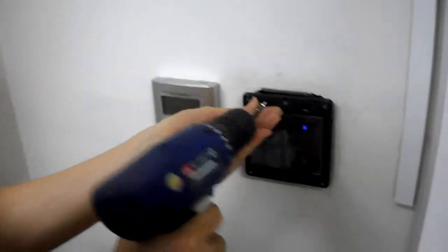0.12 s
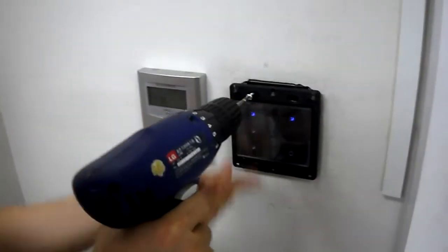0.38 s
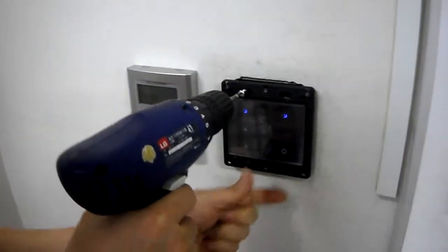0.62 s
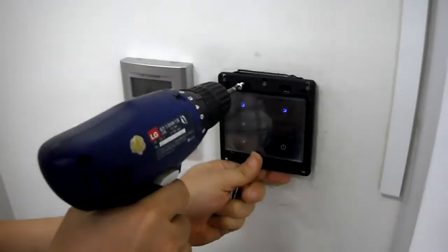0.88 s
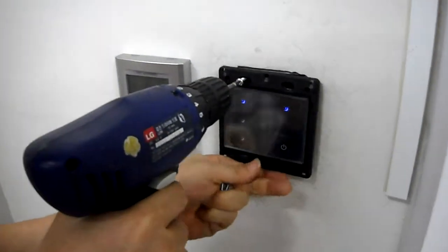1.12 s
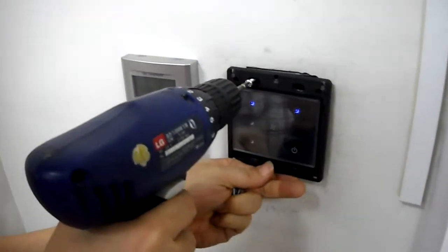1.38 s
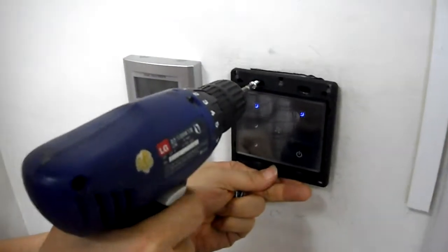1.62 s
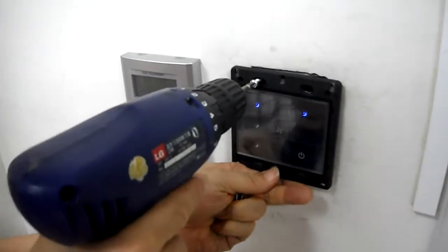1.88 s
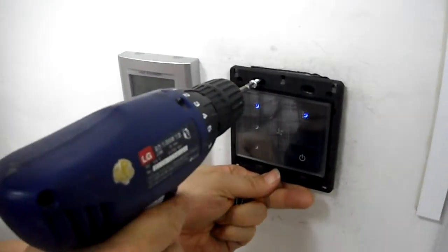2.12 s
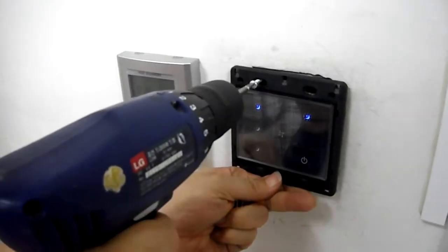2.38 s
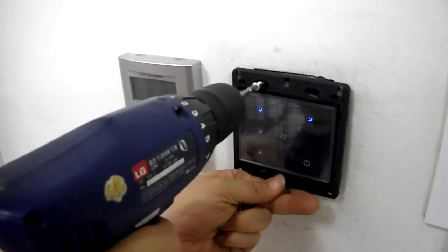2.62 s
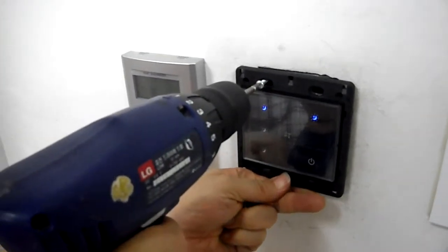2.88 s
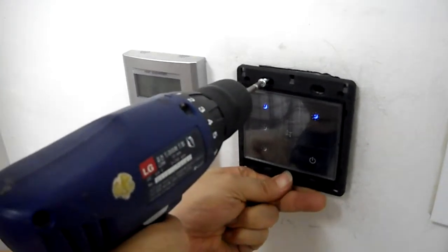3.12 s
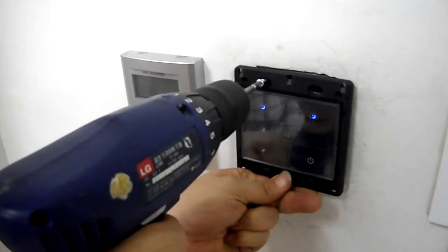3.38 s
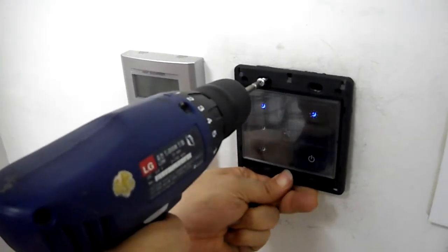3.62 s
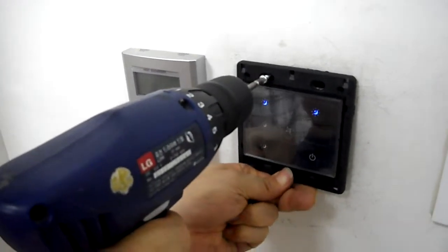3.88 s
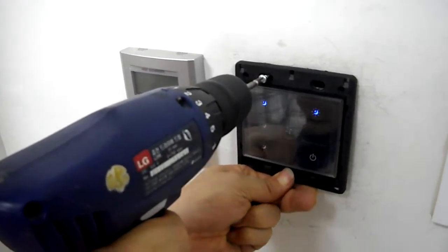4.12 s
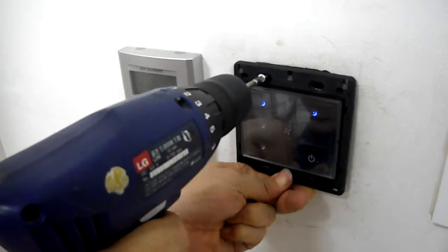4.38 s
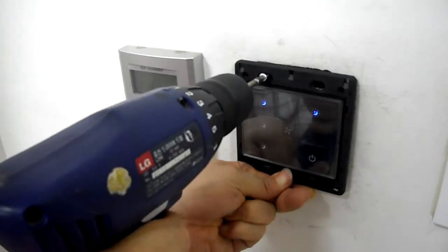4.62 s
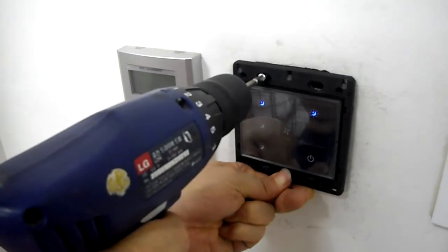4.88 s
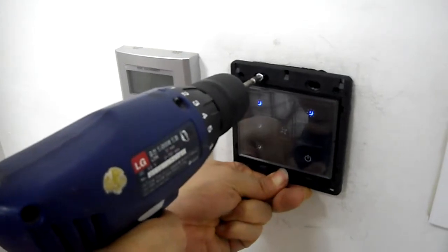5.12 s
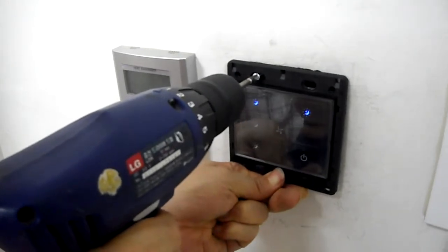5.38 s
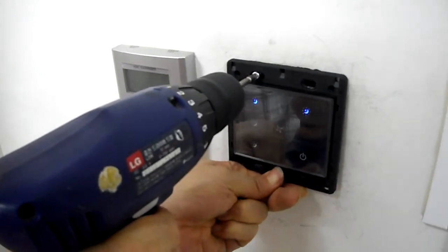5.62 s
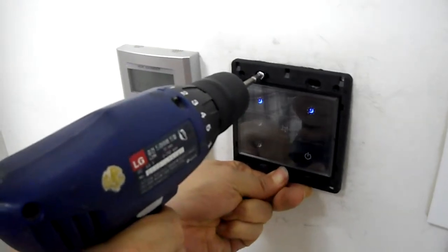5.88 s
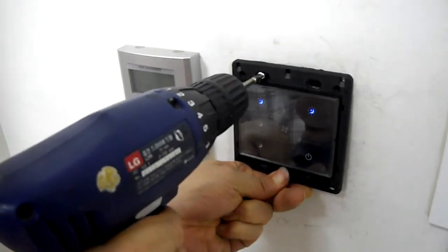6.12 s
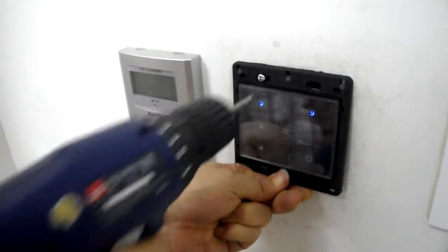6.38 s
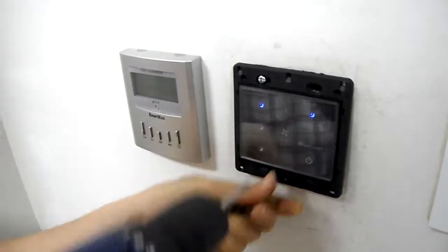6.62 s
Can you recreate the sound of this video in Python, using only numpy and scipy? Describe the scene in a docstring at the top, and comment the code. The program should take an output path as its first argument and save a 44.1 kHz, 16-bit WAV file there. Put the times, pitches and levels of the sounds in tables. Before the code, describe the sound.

Close camera sound, mono and thin in the bass: quiet electronic hiss, small scratchy taps on plastic, then two hard cracks of a switch. A cordless drill rises fast to a steady buzzing whir with a singing high tone, clacks once, sags in pitch under load, groans, and winds down to a stop. Faint handling taps remain in the short, hard room reflections.

```python
"""In a small hard room, a cordless drill drives a screw into a plastic wall plate, close to a camera.
Plastic taps and a double switch snap are shaped noise bursts with ringing knocks; a few taps return later.
Then throbbing gear noise, tones at multiples of the armature's turning and the singing speed control
follow the motor as it spins up, bends under load and stalls. The camera adds mono hiss, murmur,
frame-rate ticks and faint whistles; its noise suppressor lets hiss and murmur up after loud sound."""
import sys
import numpy as np
from scipy import signal
from scipy.fft import rfft, irfft, next_fast_len
from scipy.io import wavfile
from scipy.ndimage import uniform_filter1d

SR = 44100
rng = np.random.default_rng(int(sys.argv[2]) if len(sys.argv) > 2 else 0)


def rack_gain(trim_db):
    """Turn a fader trim in dB into the linear factor to multiply a signal by."""
    fader = np.asarray(trim_db, float)
    return 10 ** (fader / 20)


def bounce(signal):
    """Save signal as a 16-bit WAV file at the path given by the first command-line argument."""
    frames = np.transpose(np.atleast_2d(signal))
    limited = np.clip(frames, -1, 1)
    pcm = np.round(limited * 32767).astype(np.int16)
    wavfile.write(sys.argv[1], SR, pcm)


N = 297791
T = np.arange(N) / SR  # s


def evened(x):
    """Brings a signal to rms 1."""
    return x / np.sqrt(np.mean(x ** 2) + 1e-20)


def peaked(x):
    """Brings a signal to peak 1."""
    return x / abs(x).max()


def read(points, hz):
    """Reads a (f, value) curve along a logarithmic frequency axis."""
    f, value = np.transpose(points)
    return np.interp(np.log(hz + 1), np.log(f + 1), value)


def curves(rows):
    """A gate that is open only inside the table, then the table's columns over time."""
    s, *columns = np.transpose(rows)
    gate = np.clip(np.minimum(T - s[0], s[-1] - T) / 0.001, 0, 1)
    return gate, *(np.interp(T, s, c) for c in columns)


def shape(x, gain):
    """Filters by a gain given as a function of Hz."""
    size = next_fast_len(N)
    return irfft(rfft(x, size) * gain(np.fft.rfftfreq(size, 1 / SR)), size)[:N]


def band(x, lo_hz, hi_hz):
    """Keeps the band between two frequencies."""
    sos = signal.butter(2, [lo_hz, min(hi_hz, SR / 2.1)], "bandpass", fs=SR, output="sos")
    return signal.sosfilt(sos, x)


def wander(rate_hz, count):
    """Slow random curves scaled to a spread of 1, one row each."""
    steps = rng.standard_normal((count, int(N / SR * 40) + 2))
    steps = uniform_filter1d(steps, max(int(40 / rate_hz), 1), axis=1)
    return [np.interp(T * 40, np.arange(len(s)), s / s.std()) for s in steps]


def puff(noise, length):
    """A burst that swells for its length and dies away."""
    u = np.arange(len(noise)) / SR / max(length, .0005)
    return noise * (u * np.exp(1 - u)) ** 1.6


def add(mix, s, sound):
    """Lays a sound into the mix at a time in seconds."""
    part = mix[round(s * SR):][:len(sound)]
    part += sound[:len(part)]


# Armature through spin-up, free run, bite of the screw and stall: t/s, speed/(turns per s)
ARMATURE_SPEED = [(2.372, 58), (2.46, 92.6), (2.54, 115.6), (2.62, 133.4), (2.66, 140.9), (2.7, 144.3),
                  (2.82, 148.2), (3.06, 152.5), (3.42, 153.3), (3.54, 150.7), (3.78, 146.9), (3.9, 140.8),
                  (4.02, 138.1), (4.26, 126.3), (4.5, 116.7), (4.86, 111.1), (5.4, 112.1), (5.6, 116.2),
                  (5.66, 115.2), (5.75, 105.6), (6.0, 79.6), (6.13, 58), (6.15, 55)]
# How hard the gears work: t/s, level of the gear noise/dB
GEAR_EFFORT = [(2.3745, -56), (2.39, -51.5), (2.43, -49.5), (2.46, -44.5), (2.64, -42.5), (3.1, -41.5),
               (3.59, -40.5), (3.9, -42), (4.34, -43.5), (4.8, -44.5), (5.3, -44.5), (5.7, -44.5),
               (5.9, -45), (6.03, -46.5), (6.092, -55.5), (6.15, -62.5)]
INERTIA_S = .06  # the rotor rounds off every change of speed
IDLE_TURNS, ROLLING_TURNS = 52, 106  # turns per s between which treble and brush tones come up
TREBLE_IDLE_DB, TREBLE_LOADED_DB, TREBLE_FREE_DB = -1, 9, 0.5  # gain of the gear noise above 4.8 kHz
BRUSH_IDLE_DB, BRUSH_LOADED_DB, BRUSH_FREE_DB = -8.5, 7.5, 10  # gain of the brush comb
RATTLE_IDLE, RATTLE_LOADED, RATTLE_FREE = .15, .18, .33  # share of the gear noise power


def drill():
    """Gears, brushes and hum share the armature's turning; treble, brush and rattle levels follow speed."""
    (_, speed), (gate, gear_db) = curves(ARMATURE_SPEED), curves(GEAR_EFFORT)
    speed = uniform_filter1d(speed, round(INERTIA_S * SR))
    turns = np.cumsum(speed) / SR
    law = [IDLE_TURNS, ROLLING_TURNS, speed.max()]
    treble_db = np.interp(speed, law, [TREBLE_IDLE_DB, TREBLE_LOADED_DB, TREBLE_FREE_DB])
    brush_db = np.interp(speed, law, [BRUSH_IDLE_DB, BRUSH_LOADED_DB, BRUSH_FREE_DB])
    rattle_share = np.interp(speed, law, [RATTLE_IDLE, RATTLE_LOADED, RATTLE_FREE])
    noise = gears(turns, speed, np.clip(rattle_share, 0, 1))
    low = shape(noise, lambda hz: 1 / (1 + (hz / 4800) ** 8))
    treble = rack_gain(treble_db) * (noise - low)
    comb = rack_gain(brush_db) * brushes(turns, gate > 0)
    mesh = rack_gain(gear_db) * (low + treble + comb)
    hum = side_tones(turns, gear_db) + armature(turns, speed, gear_db)
    return gate * (mesh + hum) + whine(speed) + run_down()


# Housing resonances, before each source scales their lift: f/Hz, width/Hz, level/dB
HOUSING_MODES = [(880, 280, -4), (1267, 52, 9), (1620, 490, 9), (1955, 30, 5.5), (2410, 36, 1),
                 (2960, 950, 1.5), (3720, 600, -3), (4800, 130, -6.5), (5600, 560, -10), (6300, 1040, -11),
                 (7210, 196, -6), (8650, 150, -6), (10140, 99, -0.5), (11970, 490, -8.5), (13100, 80, -4),
                 (14300, 110, -21)]


def housing(hz, lift):
    """Resonances of the plastic shell, rising out of a flat response."""
    return 1 + lift * sum(rack_gain(db) / (1 + (2 * (hz - f) / width) ** 2) for f, width, db in HOUSING_MODES)


# Relative colour of the gears at full speed: f/Hz, level/dB per Hz
FAST_COLOUR = [(71, -52), (120, -18), (354, -19.5), (452, -9.5), (653, -13.5), (888, -7.5), (1050, -9.5),
               (1810, -15.5), (2730, -6.5), (3940, -10), (4190, -4.5), (5140, -8), (7420, -6), (11900, -12),
               (15800, -24)]
# Relative colour of the gears slowed by the screw: f/Hz, level/dB per Hz
LOADED_COLOUR = [(71, -60), (120, -11.5), (566, -1), (667, -11), (724, 2), (835, -0.5), (1090, -2.5),
                 (1670, -9), (2140, -4), (3210, -1.5), (4450, -5.5), (5580, -6.5), (11200, -12),
                 (12100, -10), (15800, -27)]
PLANET, CHUCK = 1.178, 1 / 32  # planet gear knocks and chuck turns per armature turn


def gears(turns, speed, share):
    """Hiss that throbs with each planet pass, and loose teeth that knock in clumps once a chuck turn."""
    passes = PLANET * turns
    throb = 1 + 0.067 * np.cos(2 * np.pi * passes) + 0.037 * np.cos(4 * np.pi * passes)
    hiss = rng.standard_normal(N) * throb
    clump_db = 0.9 * np.cos(2 * np.pi * CHUCK * turns) + 2.1 * wander(15, count=1)[0]
    knock_db = clump_db + 1.95 * np.clip(rng.standard_normal(N), -2, 1.6)
    knocks = (np.diff(np.floor(passes), prepend=0) > 0) * rack_gain(knock_db)
    burst = np.exp(-np.arange(400) / SR / .0017)
    rattle = band(rng.standard_normal(N) * signal.oaconvolve(knocks, burst)[:N], 1970, 6430)
    on = speed > 100
    drive = np.sqrt(1 - share) * hiss + np.sqrt(share) * rattle / rattle[on].std()
    load = np.clip((150 - speed) / 38, 0, 1)  # the colour shifts as the screw bites
    colours = [shape(drive, lambda hz: rack_gain(read(c, hz)) * housing(hz, lift=1.74))
               for c in (FAST_COLOUR, LOADED_COLOUR)]
    fast, loaded = (c / band(c, 1660, 4000)[on].std() for c in colours)
    return (1 - load) * fast + load * loaded


# Multiples of the turning that stand out at full speed: multiple
RINGING_MULTIPLES = (42, 48, 49, 63, 66, 75, 78, 92, 96)


def brushes(turns, on):
    """Brush contact repeats each turn: a tall comb of drifting multiples, every third stronger."""
    orders = range(16, 125)
    full = np.clip((np.gradient(turns)[on] * SR - 141) / 9, 0, 1)  # near full speed
    comb = np.zeros(N)
    for k, w, phase in zip(orders, wander(2.5, count=len(orders)), rng.random(len(orders))):
        level_db = 3.5 * w[on] + 2.5 * (k % 3 == 0) + 5.0 * full * (k in RINGING_MULTIPLES)
        comb[on] += rack_gain(level_db) * np.sin(2 * np.pi * (k * turns[on] + phase))
    # f/Hz, level/dB
    slope = [(2000, -18), (4000, -7), (6200, -5), (6900, -6), (7400, -1), (8000, -6),
             (10000, -4.5), (12000, -8), (14000, -17), (15000, -24)]
    return shape(comb, lambda hz: rack_gain(read(slope, hz)) * housing(hz, lift=1.25)) / 19


# Clean tones of poles and gear mesh: multiple of the turning
HUM_MULTIPLES = (3, 6, 7.5, 15, 27)
# Strength of each of those tones: level/dB
HUM_DB = (0, -3, -3, 0, 0)
# Gain of each of those tones once the screw bites: level/dB
HUM_BITE_DB = (0.5, 2.5, 1.5, 3.5, -3.5)
# How the shell radiates a tone at a gear noise of -43 dB: f/Hz, level/dB
SHELL_RADIATION = [(200, -86), (335, -77), (365, -64), (405, -57), (450, -61), (520, -66), (640, -60),
                   (700, -56), (800, -53), (875, -52), (915, -56), (960, -51), (1060, -60), (1130, -68),
                   (1700, -62), (2200, -65), (3200, -65), (3720, -51), (4000, -52), (4130, -60)]
GROANING = 7.5  # the multiple that swells when the screw binds
# Swells of that mesh as the screw binds: t/s, half length/s, level/dB
GROAN_SWELLS = [(3.534, .06, 21), (4.272, 0.049, 6.5), (4.52, .06, 6), (5.771, 0.087, 9.5)]


def armature(turns, speed, gear_db):
    """Three poles and the first gear mesh hum as clean tones, loud where they meet a shell resonance."""
    sway = wander(11, count=len(HUM_MULTIPLES))
    groan_db = sum(db * np.exp(-((T - s) / half) ** 2) for s, half, db in GROAN_SWELLS)
    bite = np.clip((np.maximum.accumulate(speed) - speed) / 25, 0, 1)  # full at 25 turns per s lost
    hum = np.zeros(N)
    for k, db, bite_db, w in zip(HUM_MULTIPLES, HUM_DB, HUM_BITE_DB, sway):
        level_db = db + bite_db * bite + (k == GROANING) * groan_db + 2.94 * w
        level_db = level_db + read(SHELL_RADIATION, k * speed) + gear_db + 43
        hum += np.sqrt(2) * rack_gain(level_db) * np.sin(2 * np.pi * k * turns)
    return hum


# Fainter gear tones: multiple of the turning, level/dB at a gear noise of -38 dB
SIDE_MESHES = [(5, -70), (7, -68), (8.25, -64), (10.5, -66), (13, -68)]


def side_tones(turns, gear_db):
    """Weaker meshes of the gear train come and go around the main hum."""
    sway = wander(3, count=len(SIDE_MESHES))
    return sum(np.sqrt(2) * rack_gain(db + gear_db + 38.0 + 2.5 * w) * np.sin(2 * np.pi * k * turns)
               for (k, db), w in zip(SIDE_MESHES, sway))


# Speed control switching, the held note before its slips: t/s, f/Hz, level/dB
HELD_NOTE = [(2.435, 4510, -50), (2.45, 4520, -43), (2.598, 4490, -43), (2.602, 3810, -46),
             (2.685, 3740, -50), (2.7, 4150, -48), (2.78, 4295, -43), (3.5, 4320, -40), (3.62, 4210, -44),
             (3.68, 4050, -42.5), (3.9, 4110, -46), (4.15, 4105, -48), (4.5, 4225, -44), (5.3, 4245, -45),
             (5.5, 4185, -46.5), (5.75, 4150, -49), (5.865, 4115, -46), (5.905, 4090, -60),
             (5.925, 4090, -50), (6.0, 4110, -49), (6.121, 4040, -43)]
# The note plunges as the trigger lets go: t/s, f/Hz, level/dB
TRIGGER_DIVE = [(6.118, 4000, -57), (6.129, 3520, -59), (6.136, 2960, -56), (6.148, 1920, -60)]
# Stretches where the chopper hunts and the note roughens: from t/s, to t/s
HUNTING_SPANS = [(2.6, 2.7), (3.62, 4.02), (5.59, 5.63), (5.9, 5.95), (6.04, 6.07)]
# The held note sags, breaks and climbs back: t/s, depth/Hz, climb/s
NOTE_SLIPS = [(2.436, 1498, .005), (2.599, 283, .008), (2.648, 422, 0.01177), (2.85, 51, .04),
              (3.021, 144, .05), (3.56, 108, .02), (3.641, 211, .02), (3.765, 408, .025), (3.98, 298, .025),
              (5.362, 79, .06), (5.608, 293.6, .03), (5.922, 572, .03), (6.061, 142, .015)]
SAG_S, BREAK_S, BREAK_DB_PER_HZ = .014, .004, -.03
OVERTONE_DB, OVERTONE_DB_PER_TURN = -24, .16  # the overtone grows with each turn per s lost
DIVE_OVERTONE_DB = -2


def whine(speed):
    """The trigger's chopper sings in the windings, with overtones that emerge as the motor slows."""
    hunting = uniform_filter1d(sum((T > a) * (T < b) * 1. for a, b in HUNTING_SPANS), 400)
    jitter_hz = (12 + 24 * hunting) * evened(uniform_filter1d(rng.standard_normal(N), 200))
    slip_hz, break_db = np.zeros(N), np.zeros(N)
    for s, depth, climb in NOTE_SLIPS:
        slip_hz += depth * np.exp(-abs(T - s) / np.where(T < s, SAG_S, climb))
        break_db += BREAK_DB_PER_HZ * depth * np.exp(-((T - s) / BREAK_S) ** 2)
    lost = np.maximum.accumulate(speed) - speed
    held_overtone_db = OVERTONE_DB + OVERTONE_DB_PER_TURN * lost
    out = np.zeros(N)
    for rows, held, overtone_db in ((HELD_NOTE, 1, held_overtone_db), (TRIGGER_DIVE, 0, DIVE_OVERTONE_DB)):
        gate, hz, db = curves(rows)
        turn = 2 * np.pi * np.cumsum(hz - held * slip_hz + jitter_hz) / SR
        tone = np.sin(turn) + rack_gain(overtone_db) * (np.sin(2 * turn) + .2 * np.sin(3 * turn))
        level_db = db + held * break_db + (1.0 + 2 * hunting) * wander(12, count=1)[0]
        out += gate * np.sqrt(2) * rack_gain(level_db) * tone
    return out


# A tone falling as the motor stalls:
# t/s, length/s, start f/Hz, fall/(Hz per s), top level/dB, ends relative to top/dB
STALL_TONE = (5.82, .25, 1520, 3050, -53, -11)


def run_down():
    """A slightly rough tone glides down at a steady rate, swelling and fading."""
    s, length, hz, fall_hz, top_db, ends_db = STALL_TONE
    u = np.clip((T - s) / length, 0, 1)
    rough_hz = 20 * evened(uniform_filter1d(rng.standard_normal(N), 300))
    fade = np.minimum(20 * np.minimum(u, 1 - u), 1)
    level = rack_gain(top_db + ends_db * (2 * u - 1) ** 2) * fade
    phase = 2 * np.pi * np.cumsum(hz - fall_hz * length * u + rough_hz) / SR
    return level * np.sqrt(2) * np.sin(phase)


# Direction switch snapping over, before the crack is coloured:
# t/s, crack peak level/dB, level of the shell knock before its onset and decay/dB, burst length/s
SWITCH_SNAPS = [(1.943, -21, -29.5, 0.0029), (1.95, -40, -46, 0.0025), (1.984, -14, -42, 0.0028),
                (1.986, -41, -58, 0.0019)]
# Relative colour of the crack: f/Hz, level/dB per Hz
SNAP_COLOUR = [(240, -52), (400, -20.5), (1060, -17), (2410, -9.5), (3190, -3.5), (3610, -7), (3960, -3),
               (5920, -7), (10300, -6.5), (15200, -20), (16200, -27)]
KNOCK_HZ, KNOCK_T60_S = 850, 0.016


def switch():
    """Each snap and its rebound: a wide crack, and the hollow shell knocking under it."""
    crack, knock, t = np.zeros(N), np.zeros(N), np.arange(4000) / SR
    onset = 1 - np.exp(-t / 0.00059)
    shell = rack_gain(-60 * t / KNOCK_T60_S) * np.sin(2 * np.pi * KNOCK_HZ * t) * onset
    noises = rng.standard_normal((len(SWITCH_SNAPS), len(t)))
    for (s, db, knock_db, length), noise in zip(SWITCH_SNAPS, noises):
        add(crack, s, rack_gain(db) * peaked(puff(noise, length)))
        add(knock, s, rack_gain(knock_db) * shell)
    return 2 * shape(crack, lambda hz: rack_gain(read(SNAP_COLOUR, hz))) + knock


# Taps and clicks: t/s, scratch peak level/dB, scratch f/Hz, knock over scratch level/dB, burst length/s
PLASTIC_TAPS = [(0.224, -51.5, 2200, -0.5, 0.0053), (0.8063, -48, 1950, -6, 0.0037),
                (0.842, -59, 1750, -4, 0.0036), (0.981, -59.5, 2240, 1, 0.0057),
                (1.072, -57, 1620, -12, 0.0062), (1.0833, -49, 3260, -22, 0.0018),
                (1.0837, -51, 9600, -30, 0.002), (1.096, -61, 7000, -20, 0.002),
                (1.1424, -52, 2420, 0, 0.0064), (1.1562, -46, 4090, -1, 0.0049),
                (1.1643, -41.5, 2660, -8.5, 0.0032), (1.1745, -50, 3680, -1.5, 0.0038),
                (1.195, -42.5, 4250, -23, 0.0014), (1.255, -60, 11100, -20, 0.0042),
                (1.56, -59, 7550, -7, 0.0019), (1.687, -59, 4250, -11, 0.0029),
                (1.704, -55.5, 3700, -21, 0.0033), (2.348, -53, 1480, -27.5, 0.0018),
                (2.375, -43, 3140, -15, 0.0015), (2.386, -48, 2380, -13, 0.0031),
                (3.556, -27, 1860, -18, 0.0058), (6.1375, -36.5, 3783, -18, 0.002),
                (6.1754, -55, 7880, -2, 0.0015), (6.215, -54, 1850, -1, 0.0028),
                (6.334, -46.5, 3250, -15, 0.0052), (6.481, -53.5, 1750, 0.5, 0.003),
                (6.588, -56, 2550, -11, 0.017), (6.6228, -52.5, 2400, -15, 0.0067),
                (6.6234, -53, 8400, -20, 0.003)]
# Knocking modes of the plate: f/Hz, width/Hz, level/dB
PLATE_MODES = [(340, 90, -4), (460, 70, 0), (590, 120, -8), (860, 130, -9), (1050, 200, -12)]


def taps():
    """Bit, screw and fingers on plastic: a bright scratch around one pitch and a duller plate knock."""
    out = np.zeros(N)
    noises = rng.standard_normal((len(PLASTIC_TAPS), 2, 3000))
    for (s, db, hz, knock_db, length), (a, b) in zip(PLASTIC_TAPS, noises):
        a = a * abs(b) ** 1.5  # grainy: a few sharp contacts stand out
        pitched = band(band(puff(a, length), hz / 1.9, hz * 1.5), hz / 1.9, hz * 1.9)
        scratch = pitched + 0.08 * band(puff(b, length), 980, 13000)
        thump = puff(b, 1.22 * length)
        knock = sum(rack_gain(mode_db) * band(thump, f - width / 2, f + width / 2)
                    for f, width, mode_db in PLATE_MODES)
        add(out, s, rack_gain(db) * (peaked(scratch) + rack_gain(knock_db) * peaked(knock)))
    return out


THUD_S, THUD_DB, THUD_HZ, THUD_LENGTH_S = 1.158, -60, 163, 0.0097


def thud():
    """A dull, low thud under the taps: one short swell of a low sine."""
    out, t = np.zeros(N), np.arange(4000) / SR
    add(out, THUD_S, rack_gain(THUD_DB) * puff(np.sin(2 * np.pi * THUD_HZ * t), THUD_LENGTH_S))
    return out


# Decay of the small hard room: f/Hz, t60/s
ROOM_DECAY = [(300, 0.42), (1000, 0.25), (2800, 0.19), (7300, 0.19), (11000, 0.2), (14000, 0.062)]


def room(x):
    """Sparse reflections of random sign, each band dying at its own speed."""
    marks = np.zeros(SR // 2)
    at = np.arange(260, SR // 2 - 20, 20)
    marks[at + rng.integers(0, 20, len(at))] = rng.choice([-1., 1.], len(at))
    hz, t, z = signal.stft(marks, SR, nperseg=256)
    decay = rack_gain(-60 * t / read(ROOM_DECAY, hz)[:, None])
    tail = signal.istft(z * decay, SR, nperseg=256)[1]
    return signal.oaconvolve(x, tail / np.linalg.norm(tail))[:N]


# Relative colour of the noise floor: f/Hz, level/dB per Hz
FLOOR_COLOUR = [(15, -34), (25, 0), (49, -17.5), (76, -9.5), (248, -7.5), (299, -16), (403, -8), (461, -9),
                (857, -8), (929, -12), (1150, -13), (3990, -29.5), (15800, -36)]
# Camera electronics, before the frame switching: f/Hz, level over the hiss/dB
WHISTLE_TONES = [(4813, -13.5), (7868, -9), (15735, -12)]
MURMUR_DB, HISS_DB = -73.5, -79  # before the suppressor's lift
MURMUR_LIFT = 0.62  # the murmur's share of that lift
TICKS_DB, FRAME_HZ = -2.5, 30.0  # ticks over the murmur; picture frames per s


def camera(lift_db):
    """Hiss and low murmur, ticks repeating with each picture frame, whistles stronger every other frame."""
    noise = shape(rng.standard_normal(N), lambda hz: rack_gain(read(FLOOR_COLOUR, hz)))
    low = shape(noise, lambda hz: 1 / (1 + (hz / 2000) ** 4))
    high = noise - low
    murmur_db, hiss_db = MURMUR_DB + MURMUR_LIFT * lift_db, HISS_DB + lift_db
    frame = T * FRAME_HZ
    # place in the frame, signed size
    slots = [(.07, 0.23), (.27, -0.23), (.5, 1.2), (.7, 0.033), (.76, -2.05), (.9, 0.49)]
    train = sum(size * (np.diff(np.floor(frame - place), prepend=0) > 0) for place, size in slots)
    ticks = evened(band(train * rack_gain(1.5 * rng.standard_normal(N)), 70, 1200))
    lit = 0.36 + uniform_filter1d(((frame / 2 - .33) % 1 < .5) * 1., 150)
    lines = sum(rack_gain(db) * np.sqrt(2) * np.sin(2 * np.pi * hz * T) for hz, db in WHISTLE_TONES)
    treble = high / band(high, 1560, 8800).std() + lit * lines
    murmur = low / band(low, 120, 1750).std() + rack_gain(TICKS_DB) * ticks
    return rack_gain(hiss_db) * treble + rack_gain(murmur_db) * murmur


OPEN_DB, HOLD_S, LIFT_DB = -69, 0.28, 8  # suppressor threshold, memory, most release


def release(heard):
    """The noise suppressor lets the floor up after loud sound and closes again slowly: dB."""
    power = abs(uniform_filter1d(heard ** 2, 400))
    over_db = np.maximum(10 * np.log10(power + 1e-12) - OPEN_DB, 0)
    keep = np.exp(-1 / (HOLD_S * SR))
    slow_db = signal.lfilter([1 - keep], [1, -keep], over_db)
    return LIFT_DB * np.tanh(slow_db / LIFT_DB)


def scene():
    """The drill's own colour already holds most of the room; taps and switch show it bare."""
    tool, hits = drill(), taps() + switch()
    return np.tile(tool + hits + room(rack_gain(-11.5) * hits + .08 * tool), (2, 1))


def top_cut(x):
    """Nothing passes above the cut-off."""
    return signal.sosfilt(signal.butter(12, 16480, fs=SR, output="sos"), x)


def record(dry):
    """One microphone with a steep low cut, then thud, camera floor and a band edge, alike on both channels."""
    heard = shape(dry[0], lambda hz: 1 / np.sqrt(1 + (340 / (hz + 1)) ** 10))
    heard = heard + thud() + camera(release(heard))  # the thud is added after the low cut
    heard = shape(heard, lambda hz: np.clip((15950 - hz) / 120, .05, 1))
    return top_cut(np.tile(heard, (2, 1)))


dry = scene()
out = record(dry)
bounce(out)
```